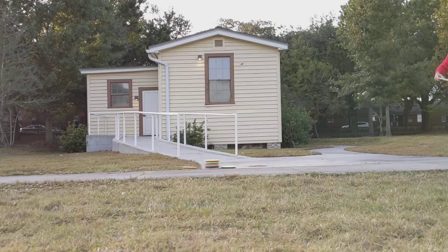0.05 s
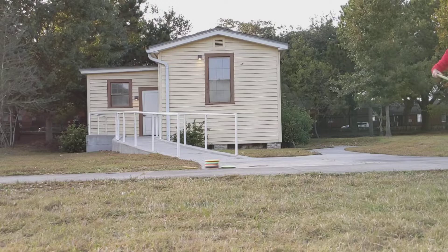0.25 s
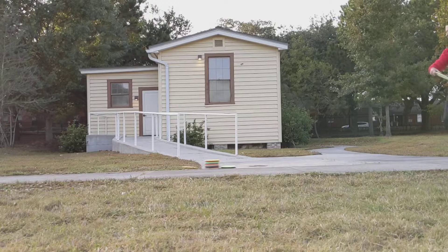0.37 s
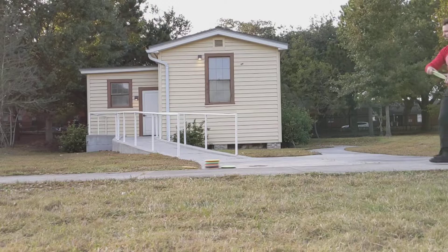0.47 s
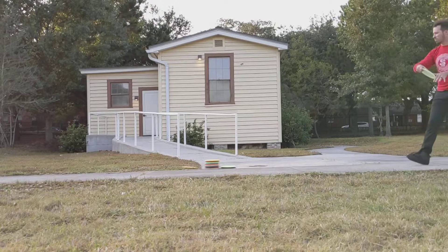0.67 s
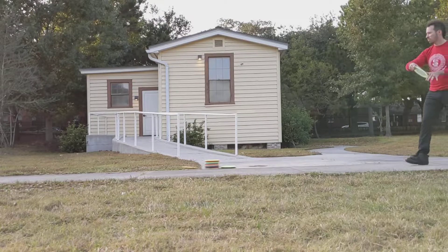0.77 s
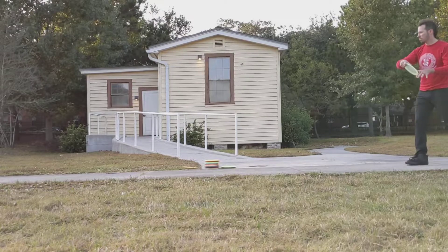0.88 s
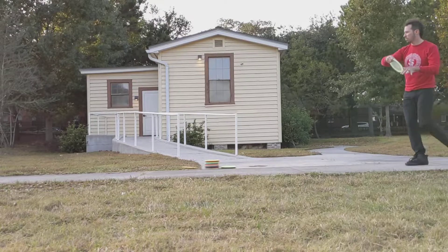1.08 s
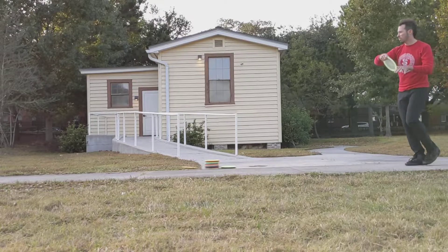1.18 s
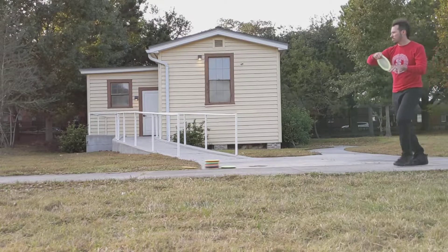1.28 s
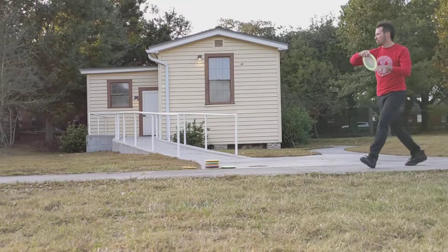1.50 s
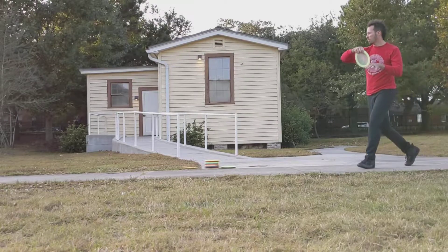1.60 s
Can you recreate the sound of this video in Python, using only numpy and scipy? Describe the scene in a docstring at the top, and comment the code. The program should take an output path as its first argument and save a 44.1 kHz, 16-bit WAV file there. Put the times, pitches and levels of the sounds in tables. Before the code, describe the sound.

Wind buffets the microphone from the start, with low rumble and thumps mostly on the right, strongest from 0.2 to 0.8 seconds. A very faint distant whistle falls around 0.1 to 0.2 seconds. Small ticks and a light scuff sound close by near 0.7 seconds. The gust then eases to a low flutter, and a far hum swells briefly around 1.3 seconds. Soft outdoor hiss continues throughout.

```python
"""Wind on a lawn near trees. At once a gust buffets the right microphone port with rumble and thumps,
while one faint whistle falls in the distance. Midway a few small ticks and a light scuff rustle close by.
Then the gust eases to a low flutter and a far hum briefly swells. An outdoor hiss lies behind it all."""
import sys
import numpy as np
from scipy import signal
from scipy.fft import rfft, irfft
from scipy.io import wavfile
from scipy.ndimage import uniform_filter1d

SR = 44100
rng = np.random.default_rng(int(sys.argv[2]) if len(sys.argv) > 2 else 0)


def inscribe(sig):
    """Save sig as 16-bit PCM at rate SR to the path in sys.argv[1].

    A 1-D sig is mono; a 2-D sig holds one channel per row.
    Samples are clipped to [-1, 1] before scaling.
    """
    pcm = np.round(np.clip(np.atleast_2d(sig).T, -1, 1) * 32767)
    wavfile.write(sys.argv[1], SR, pcm.astype(np.int16))


N = 72765
T = np.arange(N) / SR
HZ = np.fft.rfftfreq(N, 1 / SR)
LEFT_LAG_S = 0.00033  # the far sounds lie to the right


def amp(db):
    """Amplitude ratio of a level in decibels."""
    return 10 ** (np.asarray(db) / 20)


def unit(x):
    """Normalisation to rms 1."""
    return x / np.sqrt(np.mean(x ** 2) + 1e-20)


def read(points, hz):
    """Interpolation of a table on a log-frequency axis."""
    f, value = np.transpose(points)
    return np.interp(np.log(hz + 1), np.log(f), value)


def noise(gain):
    """Spectral shaping: white noise weighted by a gain at each frequency, at rms 1."""
    return unit(irfft(rfft(rng.standard_normal(N)) * gain, N))


def drift(cutoff_hz):
    """Random modulation: low-passed noise of rms 1."""
    return noise((HZ > 0) / (1 + (HZ / cutoff_hz) ** 4))


def from_right(x):
    """Path difference: sound from the right reaches the left port later."""
    return np.array([np.interp(T - LEFT_LAG_S, T, x), x])


# wind pressure on each port: time_s, level_db
LEFT_PRESSURE = [(.08, -43), (.15, -33), (.25, -41), (.43, -32), (.65, -42), (.83, -33), (.92, -48),
                 (1.05, -35.5), (1.2, -41), (1.45, -43.5), (1.53, -35.5), (1.65, -46)]
RIGHT_PRESSURE = [(.08, -25.5), (.19, -32.5), (.26, -22.5), (.35, -28.5), (.42, -26), (.55, -23.5),
                  (.7, -23.5), (.8, -31), (.87, -37.5), (.94, -33), (1.01, -40.5), (1.1, -35), (1.22, -45),
                  (1.33, -35.5), (1.5, -40), (1.65, -41.5)]
# spectrum of the turbulence: frequency_hz, density_db
RUMBLE_SPECTRUM = [(15, -61), (30, -36), (48, 2.5), (75, 2), (105, -1), (140, -4), (200, -11.5), (300, -24),
                   (450, -32.5), (800, -51.5), (2000, -85)]
def wind(pressure, lump_db=2.23, brighten_db_per_db=0.24):
    """Turbulence at a port: pressure fluctuates, and stronger flow reaches higher frequencies."""
    level_db = np.interp(T, *np.transpose(pressure)) + lump_db * drift(cutoff_hz=19.5)
    rumble = noise(amp(read(RUMBLE_SPECTRUM, HZ)))
    bass = irfft(rfft(rumble) / (1 + (HZ / 150) ** 4), N)
    upper = (rumble - bass) * amp(brighten_db_per_db * (level_db + 30))
    return amp(level_db) * (bass + upper)


# eddies striking the right port: time_s, peak_db, half_width_ms
EDDY_STRIKES = [(0.2343, -15, 2.12), (0.256, -23.5, 1.44), (0.262, -10.5, 1.57), (0.302, -15, 3.1),
                (0.393, -10.5, 2.04), (0.431, -22, 2.3), (0.5026, -6, 1.88), (0.5778, -14.5, 1.45),
                (.606, -17, 1.2), (0.6622, -9, 1.61), (0.733, -13, 2.14), (0.936, -23.5, 2.37),
                (1.131, -27, 3.6), (1.487, -30, 3.7)]
def eddies(wake=0.22, low_cut_hz=59):
    """Pressure pulses: each eddy pushes fast, pulls slowly and rebounds in the microphone's low cut."""
    low_cut = signal.butter(3, low_cut_hz, "high", fs=SR, output="sos")
    out = np.zeros(N)
    for time_s, peak_db, half_width_ms in EDDY_STRIKES:
        age = (T - time_s) * 1000 / half_width_ms
        skewed = np.log(np.maximum(1 + wake * age, 1e-6)) / wake  # the wake is slower than the front
        thump = signal.sosfilt(low_cut, np.gradient(np.exp(-skewed ** 2 / 2)))
        out += amp(peak_db) * thump / abs(thump).max()
    return out


# dry ticks: start_s, level_db, left_minus_right_db, treble_tilt_db_per_octave
TICK_EVENTS = [(.1065, -61, 1, -3), (.422, -62, 2, 2), (.669, -56, 0, 3), (.6718, -47.5, 2, 1),
               (.6918, -49, 2, -1), (.6934, -46.5, -2, -2), (.6968, -47, -1, 0), (1.1668, -48, -3, -3)]
# spectrum of the ticks and the rub: frequency_hz, density_db
RUSTLE_SPECTRUM = [(500, -22), (3800, -20), (5000, -6), (6300, 0), (8000, -0.5), (10000, -15),
                   (12500, -5.5), (15500, -4.5)]
def ticks(rise_s=.0003, decay_s=.0009):
    """Broadband transients: dry snaps that decay exponentially, each with its own brightness."""
    out = np.zeros((2, N))
    for start_s, level_db, pan_db, tilt_db in TICK_EVENTS:
        age = T - start_s
        envelope = np.clip(age / rise_s, 0, 1) * np.exp(-np.maximum(age - rise_s, 0) / decay_s)
        colour = amp(read(RUSTLE_SPECTRUM, HZ) + tilt_db * np.log2(np.maximum(HZ, 5000)))
        gains = amp([[level_db + pan_db / 2], [level_db - pan_db / 2]])
        out += gains * envelope * np.array([noise(colour), noise(colour)])
    return out


def scuff(start_s=.668, length_s=.031, pat_s=.696, pat_hz=1133):
    """Friction noise: a light rub under the main cluster of ticks ends in a soft midrange pat."""
    rubbing = (T > start_s) & (T < start_s + length_s)
    rub = amp(-61) * rubbing * noise(amp(read(RUSTLE_SPECTRUM, HZ)))
    pat_envelope = amp(-48.5) * np.exp(-((T - pat_s) / .009) ** 2)
    pat_band = noise(1 / (1 + ((HZ - pat_hz) / 145) ** 2))
    return rub + pat_envelope * pat_band


# loudness of the far hum: time_s, level_db
HUM_ENVELOPE = [(.1, -44), (.8, -43), (1.0, -44), (1.15, -52), (1.32, -38), (1.45, -56), (1.65, -53)]
def hum(pitch_hz=143.8, waver_hz=2.485):
    """Frequency modulation: a far tone, perhaps an engine, wavers at random."""
    cycles = np.cumsum(pitch_hz + waver_hz * drift(cutoff_hz=5.8)) / SR
    envelope = amp(np.interp(T, *np.transpose(HUM_ENVELOPE)))
    return from_right(envelope * unit(np.sin(2 * np.pi * cycles)))


def whistle(start_s=.08, length_s=.16, pitch_hz=1180, fall_hz_per_s=2350, width_hz=48, level_db=-54.5):
    """Narrowband noise: a faint, fuzzy whistle whose centre frequency glides down."""
    age = np.clip(T - start_s, 0, length_s)
    phase = 2 * np.pi * np.cumsum(pitch_hz - fall_hz_per_s * age) / SR
    tone = unit(drift(width_hz) * np.cos(phase) + drift(width_hz) * np.sin(phase))
    envelope = amp(level_db) * np.sqrt(abs(np.sin(np.pi * age / length_s)))
    return from_right(envelope * tone)


# spectrum of the outdoor hiss: frequency_hz, density_db
HISS_SPECTRUM = [(25, -26), (45, -1.5), (80, 12), (140, 9.5), (220, 15.5), (300, 9.5), (400, 4.5), (600, 1),
                 (880, 1.5), (1100, -3), (1750, -5), (2250, -11.5), (3000, -14.5), (4200, -20.5),
                 (6300, -21), (9000, -28.5), (12000, -34), (15500, -37.5)]
# likeness of the hiss at the two ports: frequency_hz, coherence
HISS_COHERENCE = [(100, .9), (330, 1), (520, 0.74), (750, 0), (950, 0.4), (1200, 0.47), (1700, 0.69),
                  (2300, 0.35), (5000, 0), (15000, 0.24)]
# balance of the hiss: frequency_hz, left_minus_right_db
HISS_BALANCE = [(200, -3), (500, -1), (1500, 0), (2500, 1), (5000, 1.5), (6300, 0), (9000, 3.5), (15000, 4)]
def outdoor_hiss(level_db=-44.5, fall_db_per_s=0.8, patch_db=1.07):
    """Partial coherence: the two ports share only part of the patchy hiss of far traffic and leaves."""
    hz = np.fft.rfftfreq(1024, 1 / SR)
    right_re, right_im, own_re, own_im, patches = rng.standard_normal((N // 256 + 5, 513, 5)).T
    patches = uniform_filter1d(patches, size=10, axis=0)  # smooth across frequency
    patches = unit(uniform_filter1d(patches, size=14, axis=1))  # and across time
    coherence = np.clip(read(HISS_COHERENCE, hz), -1, 1)[:, None]
    right = right_re + 1j * right_im
    left = coherence * right + np.sqrt(1 - coherence ** 2) * (own_re + 1j * own_im)
    left *= np.exp(-2j * np.pi * hz * LEFT_LAG_S)[:, None]
    lean = amp(read(HISS_BALANCE, hz) / 2)[:, None]
    colour = amp(read(HISS_SPECTRUM, hz)[:, None] + patch_db * patches)
    spectra = np.array([left * lean, right / lean]) * colour
    _, hiss = signal.istft(spectra, nperseg=1024, noverlap=768)
    return amp(level_db - fall_db_per_s * T) * unit(hiss[:, :N])


def scene():
    """Superposition: the wind on each port adds to the sounds of the lawn."""
    buffeting = np.array([wind(LEFT_PRESSURE), wind(RIGHT_PRESSURE) + eddies()])
    rustle = ticks() + np.array([scuff(), scuff()])
    return buffeting + rustle + hum() + whistle() + outdoor_hiss()


def record(dry, start_s=0.073, fade_in_s=.016, fade_out_s=.003, cutoff_hz=15750):
    """Windowing and band limiting: short fades prevent clicks, then a low-pass cuts the top treble."""
    fade_in = np.clip((T - start_s) / fade_in_s, 0, 1)
    fade_out = np.clip((T[-1] - T) / fade_out_s, 0, 1)
    low_pass = signal.firwin(511, cutoff_hz, window=("kaiser", 9), fs=SR)
    return signal.oaconvolve(dry * fade_in * fade_out, low_pass[None], "same")


dry = scene()
out = record(dry)
inscribe(out)
```